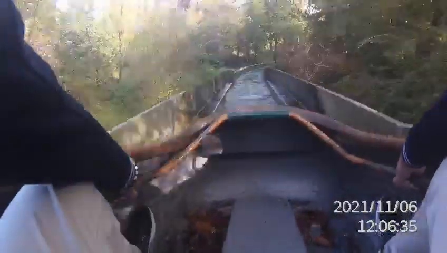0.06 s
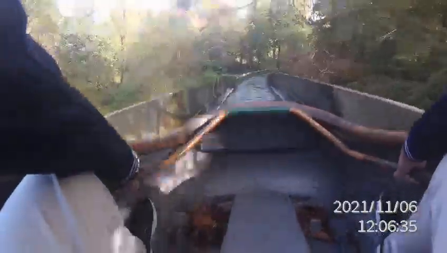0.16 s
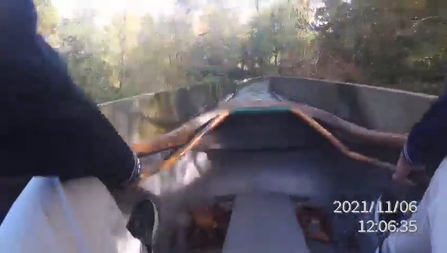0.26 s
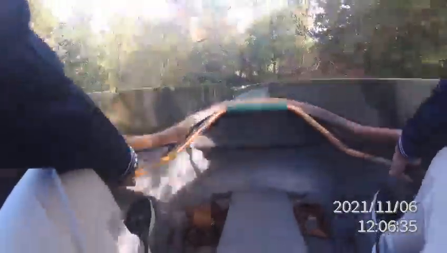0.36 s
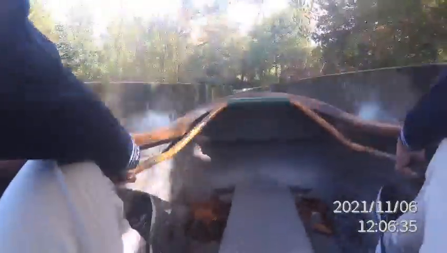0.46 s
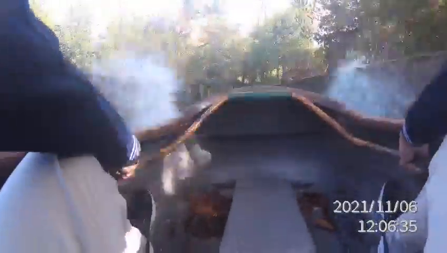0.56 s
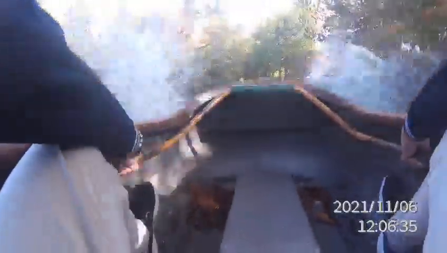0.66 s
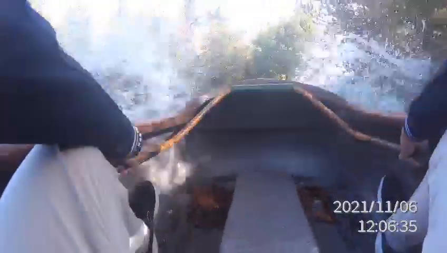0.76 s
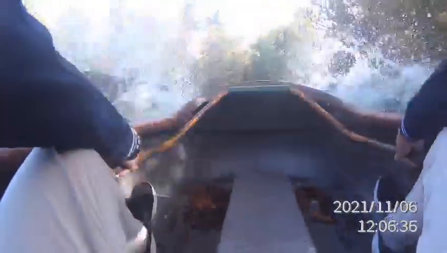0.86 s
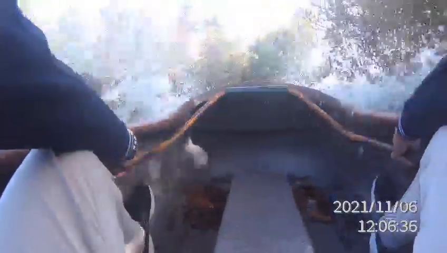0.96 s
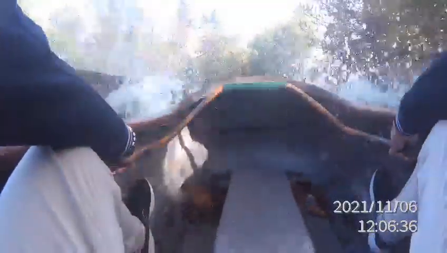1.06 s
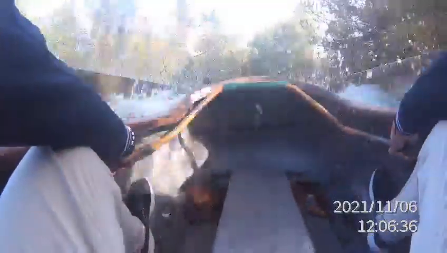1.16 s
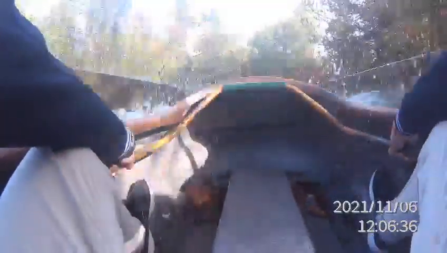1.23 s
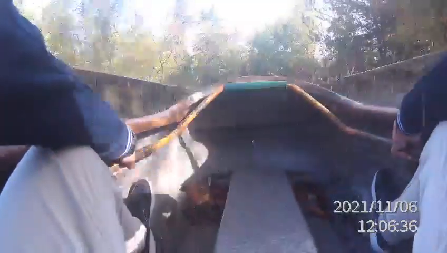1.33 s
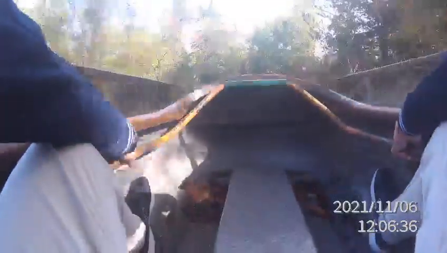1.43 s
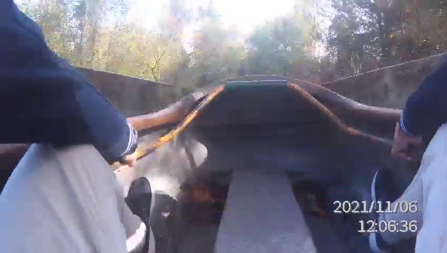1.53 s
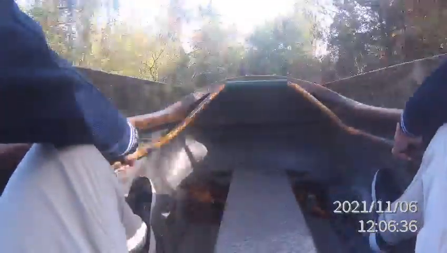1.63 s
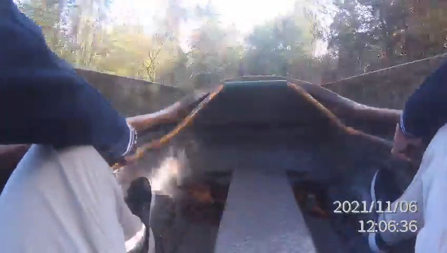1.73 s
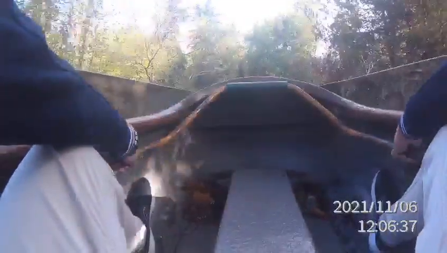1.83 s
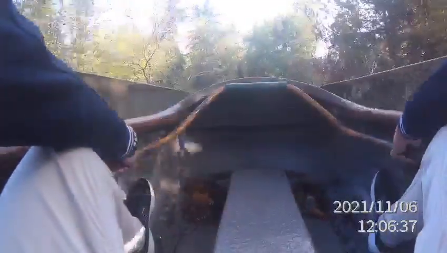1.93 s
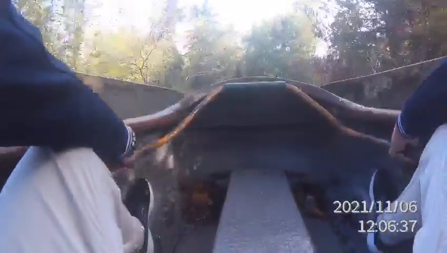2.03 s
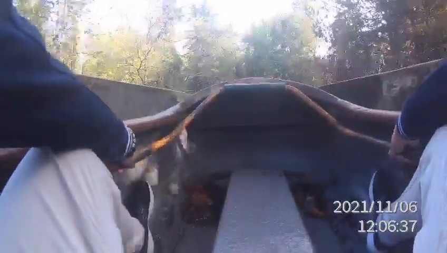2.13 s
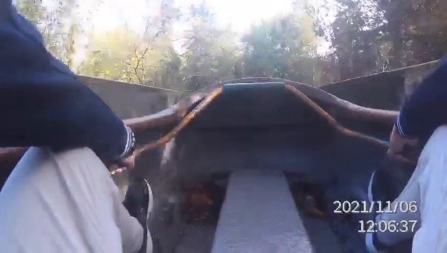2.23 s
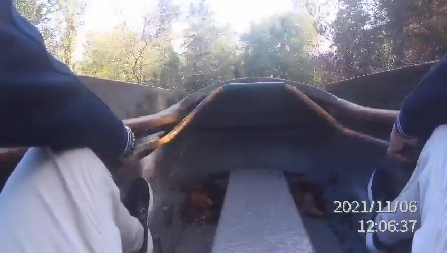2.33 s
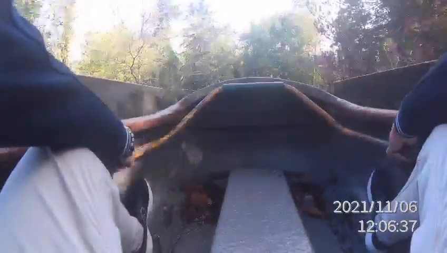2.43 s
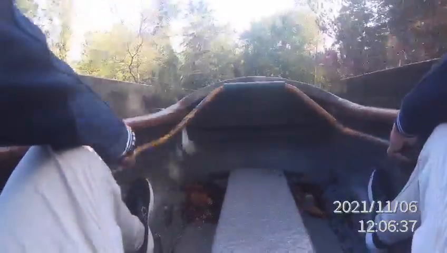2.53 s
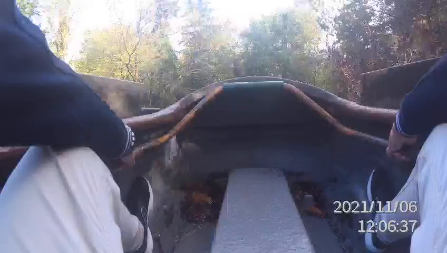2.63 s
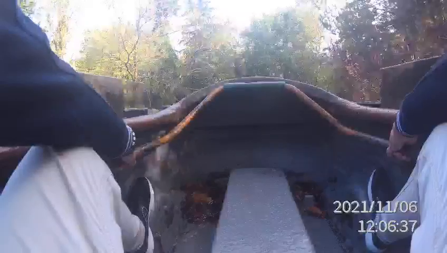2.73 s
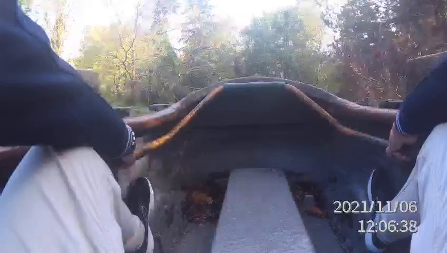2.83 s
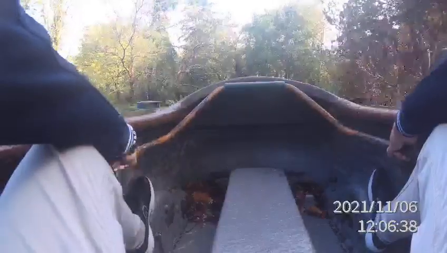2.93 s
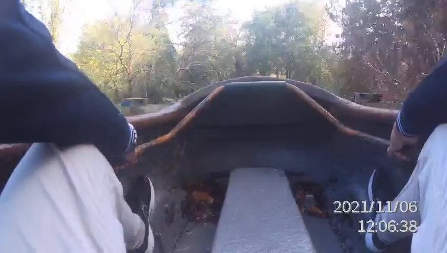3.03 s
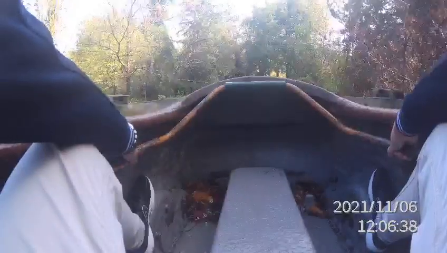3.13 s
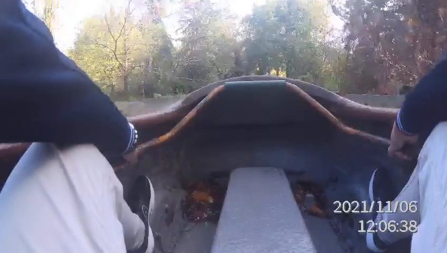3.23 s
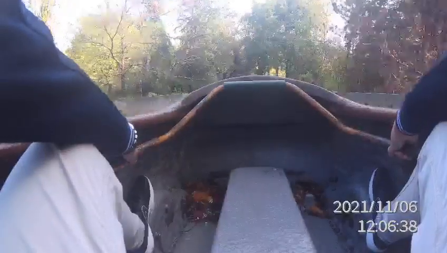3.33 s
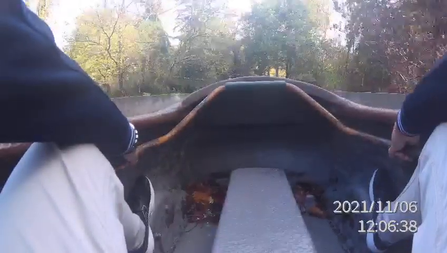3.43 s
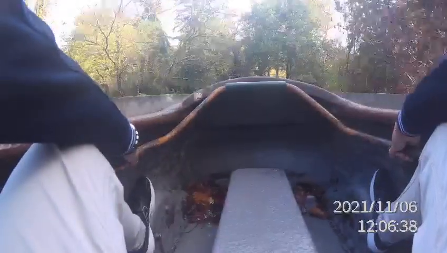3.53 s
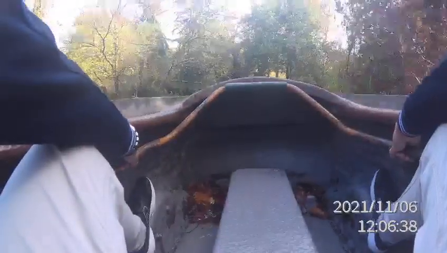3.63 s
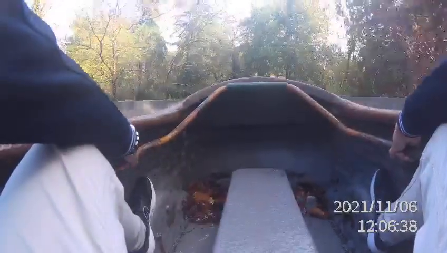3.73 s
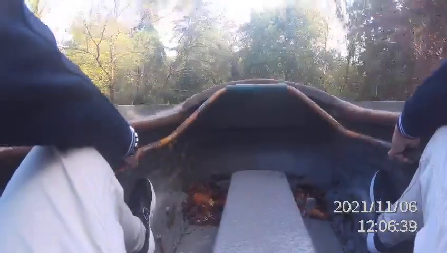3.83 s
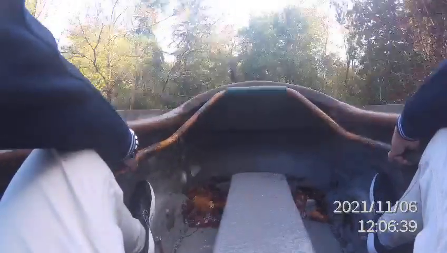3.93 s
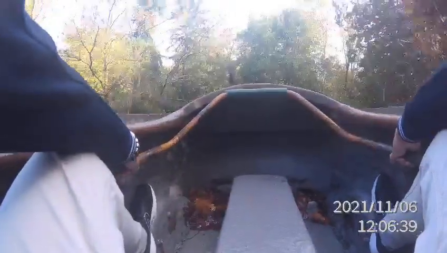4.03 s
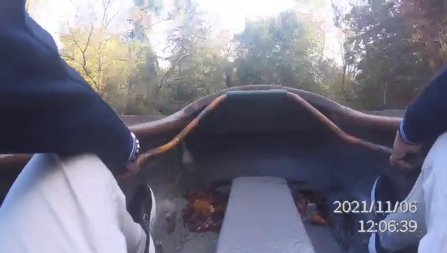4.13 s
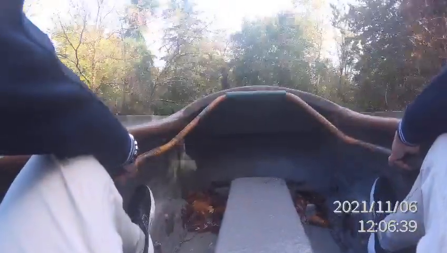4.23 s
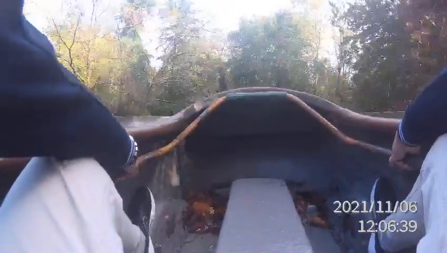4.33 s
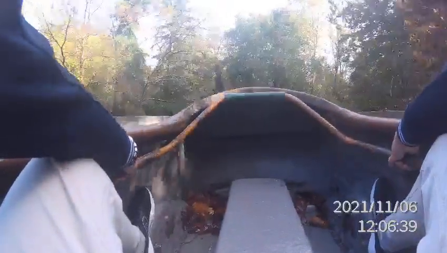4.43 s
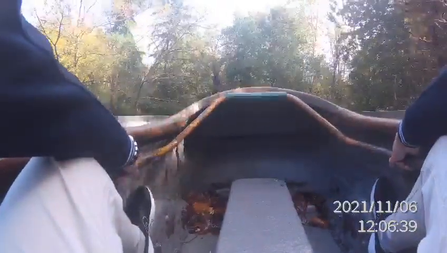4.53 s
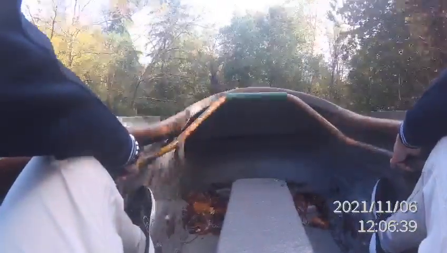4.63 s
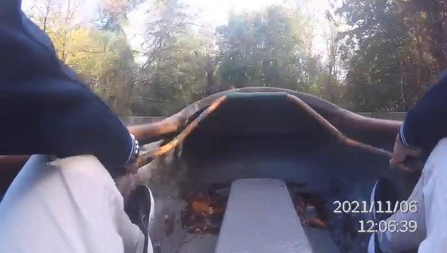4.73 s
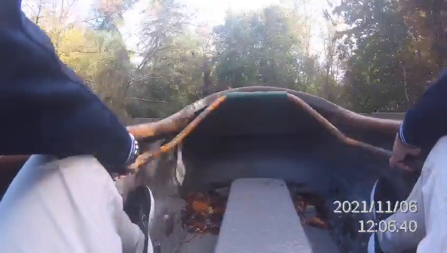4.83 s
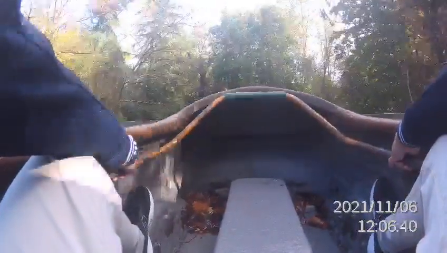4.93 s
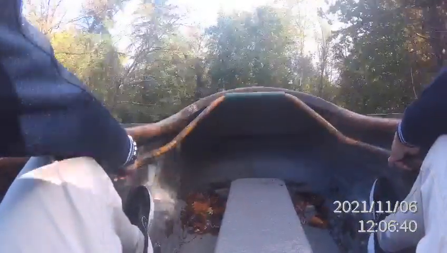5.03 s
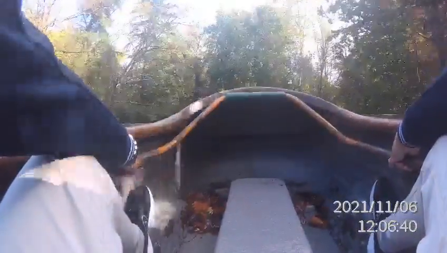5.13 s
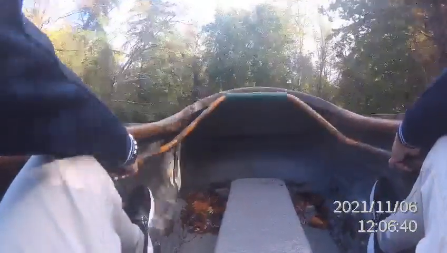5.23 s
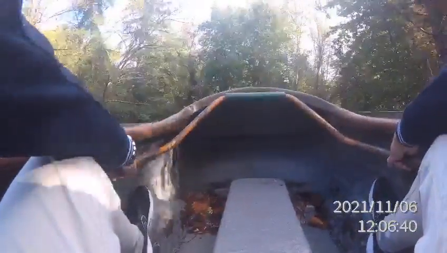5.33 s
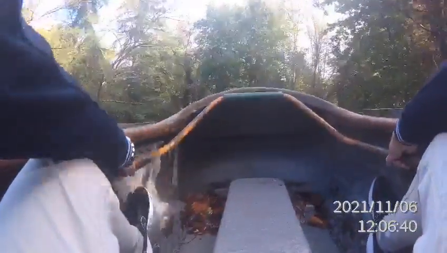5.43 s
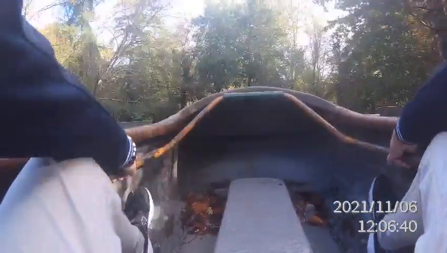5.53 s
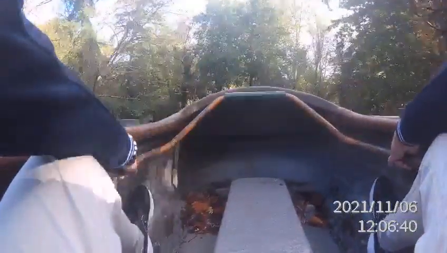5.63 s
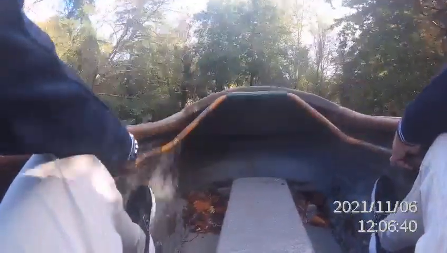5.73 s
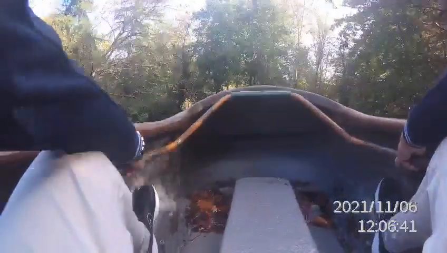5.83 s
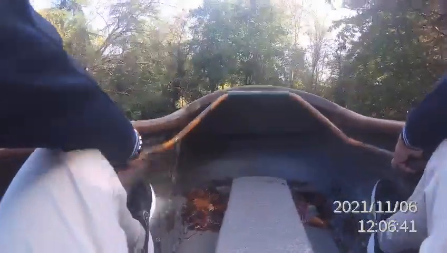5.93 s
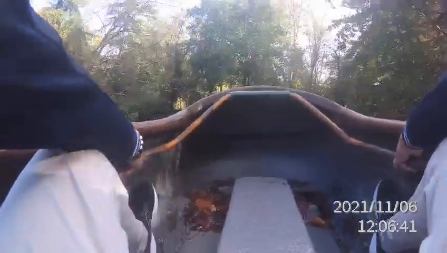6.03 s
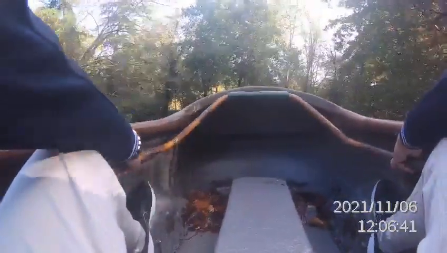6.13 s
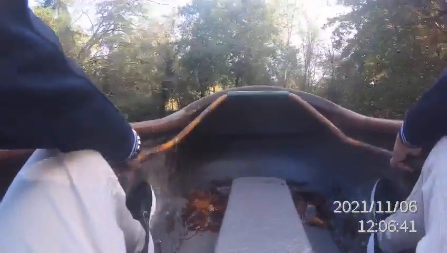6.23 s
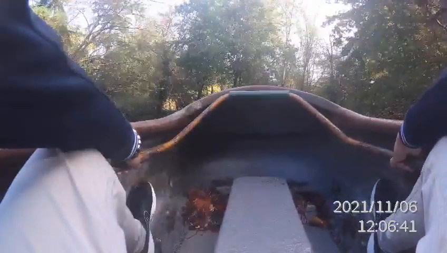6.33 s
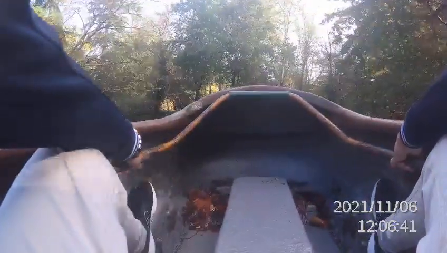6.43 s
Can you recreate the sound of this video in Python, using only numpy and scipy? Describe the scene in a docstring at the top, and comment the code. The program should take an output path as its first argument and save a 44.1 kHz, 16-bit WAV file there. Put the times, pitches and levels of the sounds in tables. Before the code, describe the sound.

Hard rattling knocks as a flume boat drops, a big roaring splash with hissing spray, then quiet lapping, gurgles and drips around the drifting hull.

```python
"""Wheels drone and hard knocks ring out as a flume boat rolls down a drop; it then ploughs into a pool.
The bow wave roars and spray rains back, then water laps and glugs at the drifting hull.
Wheels are a gliding tone; knocks excite shell modes; churn, spray and mist are shaped noise, drops and bubbles;
glugs and plips are decaying sines with noise. All but the hiss passes the modes of a waterproof camera case."""
import sys
import numpy as np
from scipy import signal
from scipy.fft import rfft, irfft, next_fast_len
from scipy.io import wavfile
from scipy.ndimage import uniform_filter1d

SR = 44100
rng = np.random.default_rng(int(sys.argv[2]) if len(sys.argv) > 2 else 0)


def log_audio(samples):
    """Write samples as a 16-bit WAV file to the path given in sys.argv[1]."""
    # one column per channel
    frames = np.atleast_2d(samples).T
    # limit to full scale, then quantise
    limited = np.clip(frames, -1, 1)
    pcm = np.round(limited * 32767).astype(np.int16)
    wavfile.write(sys.argv[1], SR, pcm)


N = 285327
T = np.arange(N) / SR

# Wheels on the track, quicker down the drop and slower in the pool.
# Each row: time in seconds, mean pitch in Hz, level in dB.
WHEELS = [(0, 87.3, -49.5), (.12, 101.9, -48), (.255, 116.1, -41.5), (.3, 109.8, -51), (.45, 94.85, -48.5),
          (.6, 90.46, -53), (.7, 79.47, -47.5), (.8, 81.15, -56.5), (1.12, 83.4, -59), (1.32, 74.33, -68),
          (1.53, 70, -60.5), (1.62, 71, -120)]
# Hard knocks of the boat. Each row: start in seconds, rms level over the first KNOCK_S in dB,
# low-pass brightness in Hz, longest delay within the blow in seconds, left minus right in dB,
# then three resonances of the spot that is hit, each as Hz and dB.
KNOCKS = [(.0438, -29, 8390, 0.0029, -5, 795, 16, 1758, 10, 3910, -2.5),
          (.073, -31, 2070, 0.0056, -1, 850, -4, 1686, 11, 3810, 22),
          (.105, -41, 6390, .004, -3, 990, 2, 1810, -3.5, 3890, 20.5),
          (.1225, -25, 6610, 0.00276, -6, 1884, 7.5, 2880, -0.5, 4940, -3.5),
          (.162, -35.5, 5310, 0.00291, -4.5, 850, 3.5, 1890, 11.5, 2730, 0),
          (.209, -36.5, 7370, 0.00393, -3, 880, -4.5, 1540, 9, 3400, 4.5),
          (.238, -20.5, 1010, 0.00255, -7, 869, -7, 1256, -6, 1648, 8.5),
          (.3045, -8, 12770, 0.002134, -1, 1642, 8, 2516, 11, 3290, 3),
          (.337, -38.5, 3900, 0.002075, -0.5, 1000, 3.5, 2040, 2.5, 3330, 2.5),
          (.388, -31.5, 7990, 0.00203, -4, 1120, -16, 1700, 3, 3460, -7.5),
          (.4458, -23.5, 5580, 0.00152, -1, 1480, -11, 2880, 14.5, 3916, 13.5),
          (.4502, -24, 2060, 0.00198, -4, 1880, 3.5, 2890, -6, 3850, 13),
          (.4747, -17.5, 7970, .0024, -7.5, 1604, 4, 2620, -8, 3880, 5.5),
          (.8328, -21.5, 8750, 0.003084, -2.5, 1897, 11.5, 3876, 10, 5160, 9),
          (.9522, -28.5, 7790, .006, -1, 950, -6, 1310, 4.5, 3510, 8),
          (1.362, -23, 6000, .0017, -4, 1503, 11.5, 3413, 16, 3640, -5)]
# Thin, bright clicks, many of them the sharp treble snap of a knock.
# Each row: start in seconds, peak in dB.
TICKS = [(.0445, -31.5), (0.125, -31.5), (0.3044, -17), (0.477, -24.5), (.834, -28), (1.286, -19.5),
         (1.3623, -18), (4.7, -35.5), (4.718, -41.5), (4.74, -42.5), (4.7618, -36), (5.389, -40.5)]
# Dull jolts of the hull. Each row: start in seconds, peak in dB, pitch in Hz, 60 dB decay in seconds.
THUMPS = [(.045, -26.5, 428, 0.0236), (.075, -25.5, 221, 0.0203), (.124, -27, 471, 0.042),
          (0.24, -27.5, 475, 0.049), (0.271, -27, 227, 0.025), (0.369, -36, 120, 0.091),
          (0.439, -31.5, 123.5, .08), (5.459, -43, 130, 0.0146)]
# Air pockets, large and low or small and high, glugging at the hull; the lowest rows (near 1.63, 4.04 # and
# 5.79 s) are dull thuds of the hull, voiced the same way. # Each row: start in seconds, peak in dB, initial
# pitch in Hz, nominal 60 dB decay in seconds.
GLUGS = [(.366, -28, 326.6, 0.07), (.373, -23.5, 1036, 0.0101), (.415, -25.5, 296, 0.187),
         (.955, -31.5, 273.5, 0.162), (1.02, -29, 489.7, 0.069), (1.403, -27.5, 805, 0.0154),
         (1.462, -30.5, 437, 0.073), (1.629, -41, 180.3, 0.42), (2.095, -45, 363, 0.056),
         (2.372, -43, 2095, 0.03), (2.382, -39, 855, 0.043), (2.44, -44.5, 335, 0.062),
         (2.876, -40, 373.7, 0.091), (3.573, -38, 422.4, 0.05), (3.578, -41.5, 883, .04),
         (4.008, -44.5, 865, 0.026), (4.035, -41.5, 926, 0.042), (4.04, -48, 93, 0.203),
         (4.073, -38.5, 421, 0.0615), (4.226, -42, 378, 0.033), (4.778, -38, 481, 0.026),
         (4.785, -34.5, 805, 0.0455), (4.794, -39.5, 345.5, 0.092), (4.835, -41.5, 853, .04),
         (4.87, -42, 323.4, 0.086), (4.93, -36.5, 795, 0.0352), (4.948, -42.5, 462, 0.074),
         (5.295, -46.5, 1636, 0.0227), (5.355, -42.5, 2105, 0.029), (5.433, -37, 552, .016),
         (5.434, -38.5, 854, 0.0276), (5.48, -42, 950, 0.036), (5.505, -40.5, 597, 0.035),
         (5.512, -36, 363, 0.079), (5.52, -43, 506, 0.048), (5.541, -41.5, 473, 0.032),
         (5.655, -44, 943, 0.061), (5.79, -51, 83, 0.224), (5.846, -42, 421.6, 0.047),
         (5.995, -47, 470, 0.056), (6.05, -44.5, 960, 0.039), (6.14, -40.5, 907, 0.116),
         (6.148, -41.5, 567, 0.039), (6.166, -41, 730, .04), (6.176, -42, 421, 0.026),
         (6.19, -45.5, 850, 0.059), (6.308, -38.5, 443.8, 0.098), (6.4, -41.5, 347.4, 0.09),
         (6.424, -44, 315, 0.06)]
# Blobs of water falling back beside the boat. Each row: start in seconds, peak in dB, pitch in Hz.
PLIPS = [(2.35, -40, 1440), (2.457, -41, 2970), (2.664, -42.5, 2610), (2.709, -52, 1300),
         (3.149, -40.5, 1548), (3.276, -41, 3080), (4.007, -39, 3270), (4.12, -49, 3000),
         (4.19, -42.5, 3000), (4.271, -48, 3500), (4.45, -42.5, 1462), (4.659, -40.5, 3015),
         (4.699, -42.5, 1550), (4.778, -41.5, 1130), (5.29, -41, 2880), (5.431, -41.5, 2300),
         (5.585, -42, 2210), (5.848, -53, 1200), (5.86, -41, 2237), (6.303, -39.5, 1687)]

# Ringing of the boat's shell. Each row: mode in Hz, relative level in dB, 60 dB decay in seconds.
SHELL_MODES = [(450, -31, 0.0205), (893, -4, 0.0224), (1077, -3.5, 0.011), (1631, -10, 0.015),
               (1858, 3, 0.0165), (2029, 0.4, 0.0145), (2483, -0.5, 0.0087), (2840, -10, 0.0134),
               (3304, -1.5, 0.0163), (3812, -5.5, 0.017), (5080, 2, 0.0082)]
# Boom of the hollow hull. Each row: mode in Hz, half the width of each of two passes in Hz, relative dB.
HULL_MODES = [(84.1, 24.6, -5.5), (127.9, 22.6, -1), (170.64, 7.8, 0.5), (275.9, 15.6, -4)]
# Modes of the camera case. Each row: Hz, width in Hz, signed gain at the left and at the right microphone.
CASE_MODES = [(372, 370, .949, .684), (506, 247, -.481, .086), (762, 127, .16, .369),
              (1064, 138, -.867, .381), (1180, 222, -.214, .687), (1306, 1005, -.099, -.684),
              (2336, 514, -.165, -.093), (2954, 215, .009, -.327), (3356, 649, -.095, -.296),
              (5765, 2743, .05, .003), (9389, 1284, -.05, -.01), (13934, 5493, -.03, -.05)]
# Gap between hull and channel walls. Each row: mode in Hz, width in Hz, added resonance in dB.
TROUGH_MODES = [(466.6, 37, -17), (826, 66, -13), (1013, 34, -8), (1578, 120, -13.5), (3460, 220, -19)]

# Colours of the water outside the case. Each row: frequency in Hz, relative gain in dB.
CHURN_COLOUR = [(40, -28), (85, -8.5), (135, -7.5), (205, -5), (280, -3), (460, 1), (620, -1), (820, -1.5),
                (1030, -2), (1350, -32), (2200, -4.5), (6000, -37)]
SPRAY_COLOUR = [(200, -30.5), (700, -2.5), (1150, -4.5), (1550, 1), (1900, -2), (2400, 0), (3100, -1),
                (4200, -1), (5200, 1.5), (6300, -2), (9000, -4.5), (15000, -4)]
MIST_COLOUR = [(2500, -11.5), (5000, 3), (8000, 0.5), (11000, 2), (15000, 0.5)]
# Water sound scattered by the boat. Each row: frequency in Hz, scattered share of the power (0-1).
SCATTER = [(100, 0), (330, 0.19), (600, 0.41), (820, .2), (1150, 0.45), (1500, 0.65), (2400, 0.43),
           (4000, .99), (15000, 0.99)]
# Hiss of the microphones. Each row: frequency in Hz, gain in dB relative to HISS_DB.
HISS_COLOUR = [(100, -7), (5000, -0.5), (6000, -0.97), (8000, -0.23), (9150, 0), (9500, 4), (9850, -0.1),
               (11000, -0.63), (15000, 1.22)]
HISS_DB, TOP_HZ = -55, 15450

# Course of each part of the water. Each row: dB on the way down, dB at the plunge, rise in seconds,
# sag in dB per second, dB adrift (at ADRIFT_S), fade adrift in dB per second.
# All are relative: each source adds its own trim.
CHURN_LEVELS = (-37.5, -33, 0.31, 3, -49, 1.83)
SPRAY_LEVELS = (-47, -34.5, 0.04, 4, -54.5, 0.5)
BOOM_LEVELS = (-50, -42.5, 0.57, 12.5, -60.5, 4)
RUMBLE_LEVELS = (-59.5, -64.5, 0.83, 12.5, -71.5, 2)
ADRIFT_S = 3  # seconds
# Waves washing along the hull, before the trim of each source.
# Each row: start in seconds, length in seconds, churning in dB, spray in dB, hull boom in dB.
LAPS = [(0.361, 0.101, -31.5, -34.5, -44.5), (0.514, 0.114, -31, -32.5, -57.5),
        (0.62, 0.073, -52.5, -34.5, -60.5), (0.816, 0.222, -35, -40, -53.5),
        (0.991, 0.108, -34.5, -57.5, -63.5), (1.245, 0.11, -45, -41, -59.5),
        (1.483, 0.103, -37.5, -52, -56.5), (1.715, 0.282, -42, -47, -56), (2.09, 0.168, -46, -55.5, -74),
        (2.335, 0.127, -56, -49.5, -59.5), (2.435, 0.141, -49, -50, -61), (3.237, 0.099, -46, -54.5, -73),
        (3.382, 0.33, -54.5, -77, -66), (3.545, 0.166, -52.5, -53.5, -58.5),
        (3.992, 0.265, -49.5, -62, -61.5), (4.429, 0.15, -56, -56.5, -86),
        (4.643, 0.225, -50, -54.5, -64.5), (4.718, 0.348, -47.5, -61, -63),
        (5.011, 0.137, -46.5, -55.5, -62.5), (5.099, 0.213, -60.5, -52.5, -65.5),
        (5.273, 0.112, -49, -62, -84), (5.409, 0.2, -47, -59, -67.5), (5.526, 0.101, -65.5, -51.5, -69.5),
        (5.63, 0.056, -53, -57.5, -80), (5.743, 0.251, -53, -77.5, -58), (5.824, 0.127, -50.5, -50, -67),
        (5.97, 0.15, -55.5, -56, -64), (6.12, 0.121, -46, -52, -67.5), (6.278, 0.403, -49.5, -52, -72)]
LAP_RISE_SHARE = 0.186  # of the length of a swell
# Mist thrown up by the bow wave and falling back.
# Each row: crest in seconds, level in dB, rise in seconds, fade in dB per second.
MIST_BURSTS = [(.58, -38, 0.138, 16), (1.33, -43.5, 0.227, 51)]
# The hull bumps and rubs along the channel. Each row: start in seconds, length in seconds, level in dB.
BUMPS = [(0.267, 0.053, -45), (1.384, 0.17, -69), (2.22, 0.41, -62), (2.7, 0.37, -68.5),
         (2.954, 0.42, -67.5), (4.697, 0.089, -64.5), (5.441, 0.05, -66), (5.82, 0.124, -62.5)]

# The bow wave rises as the boat hits the pool (s), sags while it ploughs on (for s), then collapses
# once the boat has slowed (dB/s).
PLUNGE_S, PLOUGH_S, COLLAPSE_DB_PER_S = .358, 1.13, 15.5
# Light rattle of the wheels before the plunge: mid level, full spread, range of brightness, blow length.
RATTLE_DB, RATTLE_SPREAD_DB, RATTLE_HZ, RATTLE_BLOW_S = -41.5, 5, (2500, 6000), .004
# Sharpness of a struck spot's resonances; time over which a knock's rms level is taken.
SPOT_Q, KNOCK_S = 8.8, 0.00992
# Faint random glugs: mid peak, full spread, range of pitch, nominal decay in cycles.
SMALL_GLUG_DB, SMALL_GLUG_SPREAD_DB, SMALL_GLUG_HZ, SMALL_GLUG_CYCLES = -47, 5.5, (311, 2975), 22.8
# Bubbles shed by each row of GLUGS: latest delay, relative peak, full range of pitch, nominal decay in cycles.
GURGLE_S, GURGLE_DB, GURGLE_OCTAVES, GURGLE_CYCLES = .06, -11, 1.339, 20.8
# Pockets below this pitch sag by one share while they ring; the others climb by the second share.
SAG_BELOW_HZ, GLUG_SAG, GLUG_RISE = 1000, 0.204, 0.15


def undb(db):
    """Logarithmic level: decibels to amplitude gain."""
    return 10 ** (np.asarray(db) / 20)


def curve(table, column):
    """Linear interpolation in time of one column of a table."""
    rows = np.array(table)
    return np.interp(T, rows[:, 0], rows[:, column])


def along(points, n):
    """Interpolation in log frequency of (Hz, value) points over an n-sample spectrum."""
    hz, value = np.transpose(points)
    return np.interp(np.log(np.fft.rfftfreq(n, 1 / SR) + 1), np.log(hz), value)


def filtered(x, response):
    """Linear filtering: the spectrum is multiplied by a response, a function of transform length."""
    n = next_fast_len(x.shape[-1] + SR // 10, True)
    return irfft(rfft(x, n) * response(n), n)[..., :x.shape[-1]]


def colour(x, points):
    """Spectral shaping by (Hz, dB) points."""
    return filtered(x, lambda n: undb(along(points, n)))


def resonate(x, hz, width_hz):
    """Damped oscillator: a two-pole resonance with gain 1 at its centre."""
    centre_hz = min(hz, .45 * SR)
    b, a = signal.iirpeak(centre_hz, hz / min(width_hz, SR / 5), SR)
    return signal.lfilter(b, a, x)


def lift(x, hz, width_hz, db):
    """Superposition: the sound plus its own response at one resonance."""
    return x + undb(db) * resonate(x, hz, width_hz)


def case(x):
    """Modal sum: each case mode drives the two microphones with its own strength and sign."""
    left, right = np.broadcast_to(x, (2, x.shape[-1]))
    return sum(np.array([left_gain * resonate(left, hz, width), right_gain * resonate(right, hz, width)])
               for hz, width, left_gain, right_gain in CASE_MODES)


def trough(x):
    """Cavity resonance: water sound rings between the hull and the channel walls."""
    for hz, width_hz, db in TROUGH_MODES:
        x = lift(x, hz, width_hz, db)
    return x


def unit(x):
    """Normalisation: the mean of the channels gets a standard deviation of 1."""
    return x / np.std(np.atleast_2d(x).mean(axis=0))


def pan(db):
    """Level difference between channels: gains for left minus right in dB."""
    return undb([[db / 2], [-db / 2]])


def add(out, s, sound, peak_db):
    """Superposition: a short stereo sound enters at time s, its channel mean scaled to a given peak."""
    i = max(int(s * SR), 0)
    peak = np.abs(sound.mean(axis=0)).max()
    out[:, i:i + sound.shape[1]] += (sound * undb(peak_db) / peak)[:, :N - i]


def power_sum(*gains):
    """Incoherent addition: unrelated sounds add in power."""
    return np.sqrt(sum(g ** 2 for g in gains))


def walk(rate):
    """Smoothed random steps: a wander with a spread near 1, at a rate in steps per second."""
    k = int(SR / rate)
    steps = np.repeat(rng.standard_normal(N // k + 1), k)
    return 1.3 * uniform_filter1d(uniform_filter1d(steps, k), k)[:N]


def patter(per_s, spread_db):
    """Shot noise: impacts of random time, sign and size; a positive spread makes a few stand out."""
    size = undb(spread_db * np.minimum(rng.exponential(size=N), 5))
    hits = rng.random(N) < per_s / SR
    return unit(hits * size * rng.choice([-1, 1], N))


def bubble(hz, t60, rise):
    """Volume oscillation of an air pocket: a decaying sine whose pitch glides by the share rise."""
    t = T[:int(t60 * SR)]
    return np.sin(2 * np.pi * hz * t * (1 + rise * t / t60 / 2)) * undb(-60 * t / t60)


def bubbles(low_hz, high_hz, cycles, spread_db, rise, count):
    """Random superposition: a crowd of bubbles of all pitches, scattered through time."""
    out = np.zeros(N + SR)
    for when, pitch, life, size in rng.random((count, 4)):
        hz = low_hz * (high_hz / low_hz) ** pitch
        ring = bubble(hz, cycles * (.5 + life) / hz, rise)
        size_gain = undb(-spread_db * np.log(max(size, np.exp(-3))))
        i = int(when * N)
        out[i:i + len(ring)] += ring * hz * size_gain
    return unit(out[:N])


def scatter(x, smear_s=0.0033):
    """Diffuse scattering: part arrives straight, the rest as smeared noise that differs left and right."""
    keep = np.exp(-1 / (smear_s * SR))
    envelope = np.sqrt(signal.lfilter([1 - keep], [1, -keep], x ** 2))
    wet = envelope * rng.standard_normal((2, N))
    share = lambda n: np.clip(along(SCATTER, n), 0, 1)
    return filtered(x, lambda n: np.sqrt(1 - share(n))) + filtered(wet, lambda n: np.sqrt(share(n)))


def heard(water, points):
    """Transmission path: water is coloured, then crosses channel and case, and is set to unit strength."""
    return unit(case(trough(colour(scatter(water), points))))


def swell(s, length):
    """Wave envelope: a rounded swell that rises faster than it falls."""
    crest = s + length * np.clip(LAP_RISE_SHARE, .05, .95)
    return np.sin(np.pi / 2 * np.interp(T, [s, crest, s + length], [0, 1, 0]))


def ride(levels):
    """Source strength over time: the way down, the bow wave, then the slow drift."""
    down_db, plunge_db, rise_s, sag, adrift_db, adrift_fade = levels
    since = np.maximum(T - PLUNGE_S, 0)
    afloat = np.clip(since / rise_s, 0, 1)
    wave_db = plunge_db - sag * since - COLLAPSE_DB_PER_S * np.maximum(since - PLOUGH_S, 0)
    drift_db = adrift_db - adrift_fade * (T - ADRIFT_S)
    return (1 - afloat) * undb(down_db) + afloat * power_sum(undb(wave_db), undb(drift_db))


def flow(levels, column):
    """Incoherent addition of the lapping waves to the ride, at the strength in one column of LAPS."""
    return power_sum(ride(levels), *(swell(lap[0], lap[1]) * undb(lap[column]) for lap in LAPS))


def hull(boom_db=1.0, pan_db=-1):
    """Forced resonance: flow noise booms in the hull, beside a harmonic wheel drone and channel rumble."""
    push = rng.standard_normal(N)
    boom = sum(undb(db) * resonate(resonate(push, hz, 2 * w), hz, 2 * w) for hz, w, db in HULL_MODES)
    wheel_hz = curve(WHEELS, column=1) * (1 + 0.0568 * walk(40.32))
    turn = 2 * np.pi * np.cumsum(wheel_hz) / SR
    drone = (np.sin(turn) + undb(-22) * np.sin(2 * turn)) * undb(2.5 * walk(35))
    rumble = resonate(resonate(rng.standard_normal(N), 48.7, 46), 48.7, 46)
    rubbing = power_sum(ride(RUMBLE_LEVELS), *(swell(s, length) * undb(db) for s, length, db in BUMPS))
    boom = unit(case(boom)) * flow(BOOM_LEVELS, column=4) * undb(boom_db)
    drone = unit(case(drone)) * undb(curve(WHEELS, column=2))
    return (boom + drone + unit(case(rumble)) * rubbing) * pan(pan_db)


def churn(turbulence_db=5.5, trim_db=-4.0, pan_db=-0.74):
    """Turbulence and entrained air: big bubbles and broadband noise along the hull."""
    water = bubbles(214.7, 1408.7, cycles=15.35, spread_db=0.5, rise=0.395, count=3600)
    water = water + undb(turbulence_db) * rng.standard_normal(N)
    water = water * undb(0.21 * walk(24))
    return heard(water, CHURN_COLOUR) * flow(CHURN_LEVELS, column=2) * undb(trim_db) * pan(pan_db)


def spray(sheet_db=2.5, bubble_db=1, drip_db=2.5, calm_db=-54):
    """Shot noise: drops flurry over a hissing sheet; a sparser patter of similar drips gains as it calms."""
    strength = flow(SPRAY_LEVELS, column=3)
    drops = patter(2000, spread_db=1.5)
    small = bubbles(1170.0, 5580, cycles=25.8, spread_db=0.5, rise=0.203, count=5000)
    sheet = undb(sheet_db) * rng.standard_normal(N)
    flurries = (drops + undb(bubble_db) * small + sheet) * undb(1.146 * walk(35))
    calm = 1 / (1 + strength / undb(calm_db))
    drips = undb(drip_db) * calm * patter(340, spread_db=-1.0)
    return heard(flurries + drips, SPRAY_COLOUR) * strength


def fat_drops(trim_db=-7, calm_db=-46):
    """Bubble resonance: heavier nearby drops each ring briefly, surge in flurries and recede with calm."""
    drops = bubbles(1100, 5200, cycles=14, spread_db=3.5, rise=.2, count=750) * undb(2.5 * walk(14))
    strength = ride(SPRAY_LEVELS)
    strength = strength / (1 + undb(calm_db) / strength)
    return unit(case(colour(drops, SPRAY_COLOUR))) * strength * undb(trim_db)


def microphone_hiss():
    """Self-noise: independent coloured noise in each microphone."""
    return colour(rng.standard_normal((2, N)), HISS_COLOUR) * undb(HISS_DB)


def rattle(count):
    """Random excitation: light wheel knocks before the plunge, as KNOCKS rows without spot resonances."""
    low_hz, high_hz = RATTLE_HZ
    return [(when * PLUNGE_S, RATTLE_DB + RATTLE_SPREAD_DB * (size - .5),
             low_hz + pitch * (high_hz - low_hz), RATTLE_BLOW_S, 0)
            for when, size, pitch in rng.random((count, 3))]


def smeared_blow(length, size):
    """Dispersion: after crossing the shell each frequency has its own delay, up to length seconds."""
    hz = np.fft.rfftfreq(size, 1 / SR)
    knots = np.linspace(0, SR / 2, 40)
    delay = np.interp(hz, knots, length * rng.random(len(knots)))
    phase = 2 * np.pi * np.cumsum(delay) * SR / size
    return irfft(np.exp(-1j * phase), size)


def knocks(snap_db=-9, tail_db=-40, tail_t60=0.0497):
    """Modal excitation: blows ring the shell, coloured by the spot hit; softer contacts sound duller."""
    out, t = np.zeros((2, N)), T[:SR // 12]
    for s, db, soft_hz, length, pan_db, *spot in list(KNOCKS) + rattle(count=6):
        echo = rng.standard_normal((2, len(t))) * undb(tail_db - 60 * t / tail_t60)
        contact = smeared_blow(length, size=len(t)) * (t < t[-1] / 2) + echo
        b, a = signal.butter(2, min(soft_hz, .45 * SR), fs=SR)
        force = signal.lfilter(b, a, contact)
        # a mode's bandwidth follows from its decay time
        ringing = sum(undb(mode_db) * resonate(force, hz, np.log(1000) / (np.pi * t60))
                      for hz, mode_db, t60 in SHELL_MODES)
        blow = undb(snap_db) * force + ringing
        for hz, spot_db in zip(spot[::2], spot[1::2]):
            blow = lift(blow, hz, hz / SPOT_Q, spot_db)
        blow = case(blow) * pan(pan_db)
        # turn the tabled rms level into a peak level
        crest = np.abs(blow.mean(axis=0)).max() / np.sqrt(np.mean(blow[:, t < KNOCK_S] ** 2))
        add(out, s, blow, db + 20 * np.log10(crest))
    return out


def ticks(t60=0.0076):
    """Impulsive excitation: a thin, bright click of decaying noise, often the treble snap of a knock."""
    out, t = np.zeros((2, N)), T[:SR // 20]
    for s, db in TICKS:
        burst = rng.standard_normal(len(t)) * undb(-60 * t / t60)
        bright = resonate(resonate(burst, 8300, 12000), 8300, 12000)
        add(out, s, case(bright) * undb([[-3], [0]]), db)
    return out


def thumps(onset_s=0.00059):
    """Damped oscillation: the jolted hull answers with a dull, short note."""
    out, t = np.zeros((2, N)), T[:SR // 6]
    for s, db, hz, t60 in THUMPS:
        note = np.sin(2 * np.pi * hz * t) * undb(-60 * t / t60) * (1 - np.exp(-t / onset_s))
        add(out, s, case(note), db)
    return out


def gurgle(s, db, hz, count):
    """Bubble break-up: weaker bubbles, higher or lower, shed by an air pocket, as GLUGS rows."""
    when, pitch = rng.random((count, 2)).T
    pitch_hz = hz * 2 ** (GURGLE_OCTAVES * (pitch - .5))
    start = np.minimum(s + GURGLE_S * when, T[-1])
    return list(zip(start, np.full(count, db + GURGLE_DB), pitch_hz, GURGLE_CYCLES / pitch_hz))


def small_glugs(count):
    """Random air entrainment: faint pockets once the bow wave begins to collapse, as GLUGS rows."""
    start, (low_hz, high_hz) = PLUNGE_S + PLOUGH_S, SMALL_GLUG_HZ
    when, size, pitch = rng.random((count, 3)).T
    hz = low_hz * (high_hz / low_hz) ** pitch
    peak_db = SMALL_GLUG_DB + SMALL_GLUG_SPREAD_DB * (size - .5)
    return list(zip(start + when * (T[-1] - start), peak_db, hz, SMALL_GLUG_CYCLES / hz))


def glugs(slap_db=-11, slap_life=1.5, slap_max_s=.1, onset=.04):
    """Trapped-air resonance: a wavelet slaps the hull and a pocket rings, gliding down if low, up if high."""
    out, t = np.zeros((2, N)), T[:SR // 4]
    shed = [row for s, db, hz, _ in GLUGS for row in gurgle(s, db, hz, count=2)]
    for s, db, hz, t60 in list(GLUGS) + shed + small_glugs(count=24):
        glide = -GLUG_SAG if hz < SAG_BELOW_HZ else GLUG_RISE
        ring = bubble(hz, min(0.92 * t60, t[-1]), glide)
        slap_hz = max(hz, 650)
        slap_width = 1.12 * slap_hz
        slap = resonate(resonate(rng.standard_normal(len(t)), slap_hz, slap_width), slap_hz, slap_width)
        slap = unit(slap) * undb(slap_db - 60 * t / min(slap_life * t60, slap_max_s))
        glug = np.pad(ring, (0, len(t) - len(ring))) + slap
        glug = glug * (1 - np.exp(-t / (onset * t60)))
        add(out, s, case(trough(glug)), db)
    return out


def mist(pan_db=-6):
    """Dense shot noise: countless tiny droplets fizz while the bow wave is thrown high."""
    fizz = patter(6200, spread_db=0.5) * undb(1.2 * walk(33.65))
    bursts = (np.clip(1 + (T - s) / rise, 0, 1) * undb(db - fade * np.maximum(T - s, 0))
              for s, db, rise, fade in MIST_BURSTS)
    return heard(fizz, MIST_COLOUR) * power_sum(*bursts) * pan(pan_db)


def plips(splat_t60=0.0377, ring_db=-3, cycles=48, rise=0.15, onset_s=0.0035):
    """Impact and bubble resonance: a falling blob splats softly and leaves a tiny ringing bubble."""
    out, t = np.zeros((2, N)), T[:SR // 8]
    for s, db, hz in PLIPS:
        splat = unit(resonate(rng.standard_normal((2, len(t))), hz, 0.72 * hz)) * undb(-60 * t / splat_t60)
        ring = bubble(hz, min(cycles / hz, t[-1]), rise)
        plip = splat + undb(ring_db) * np.pad(ring, (0, len(t) - len(ring)))
        add(out, s, case(plip) * (1 - np.exp(-t / onset_s)), db)
    return out


def scene():
    """Superposition of boat, water and the microphones' own hiss."""
    boat = hull() + knocks() + ticks() + thumps()
    water = churn() + spray() + fat_drops() + glugs() + mist() + plips()
    return boat + water + microphone_hiss()


def record(dry):
    """Overload and band-limiting: peaks beyond full scale are clipped, then the top is cut at TOP_HZ."""
    low_pass = signal.ellip(10, .1, 70, TOP_HZ, fs=SR, output="sos")
    return signal.sosfilt(low_pass, np.clip(dry, -1, 1))


dry = scene()
out = record(dry)
log_audio(out)
```